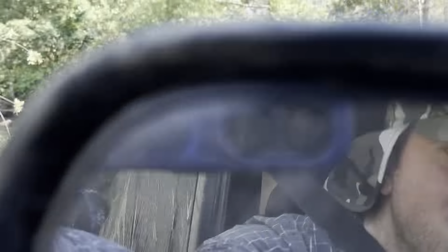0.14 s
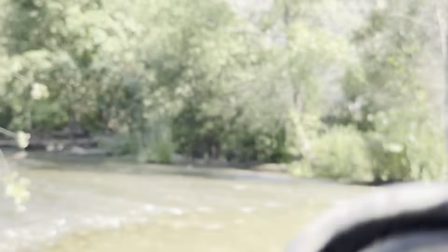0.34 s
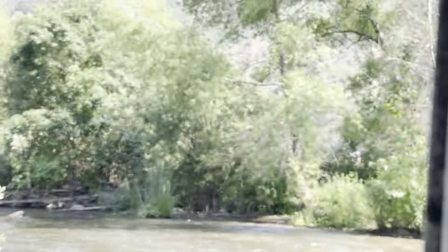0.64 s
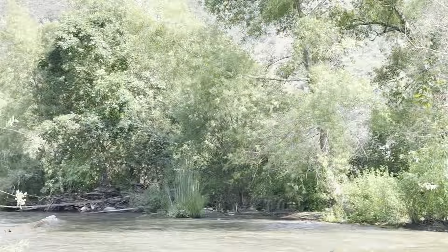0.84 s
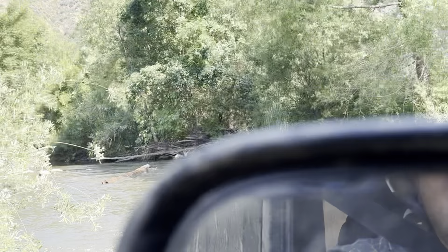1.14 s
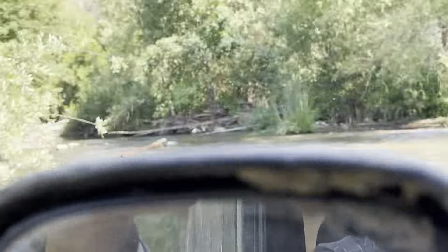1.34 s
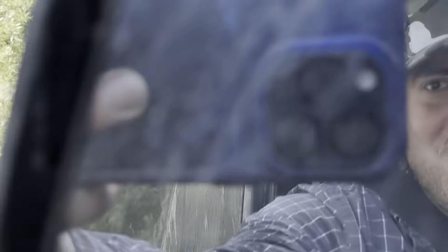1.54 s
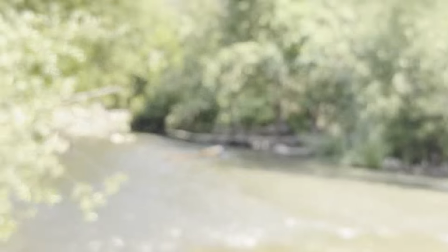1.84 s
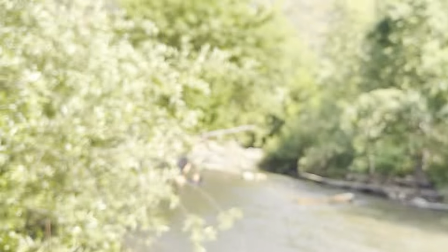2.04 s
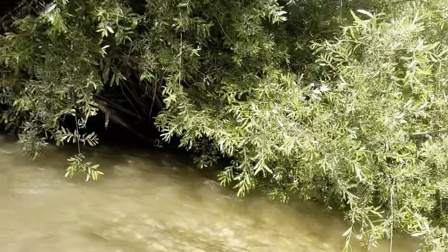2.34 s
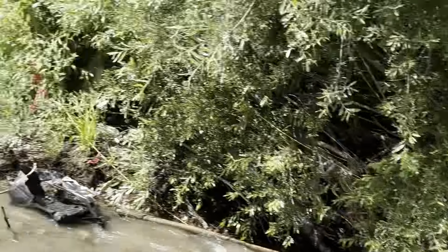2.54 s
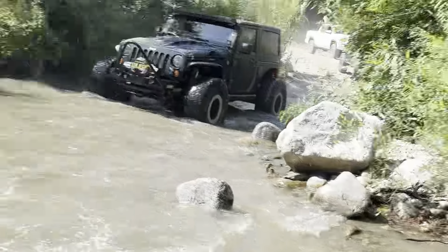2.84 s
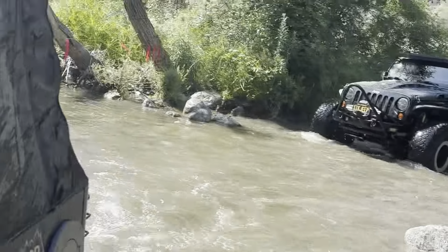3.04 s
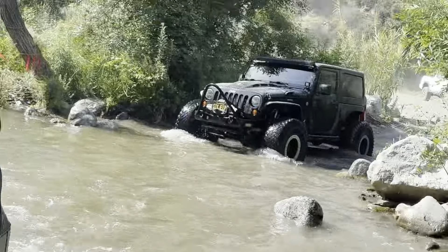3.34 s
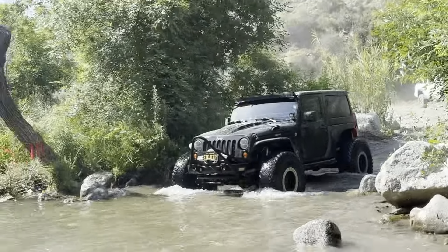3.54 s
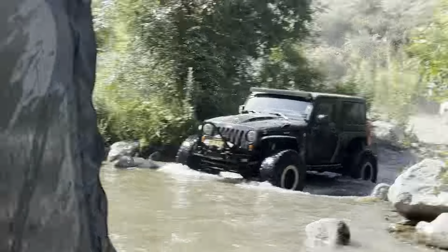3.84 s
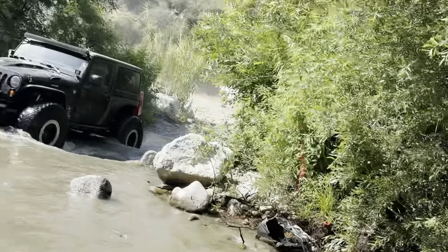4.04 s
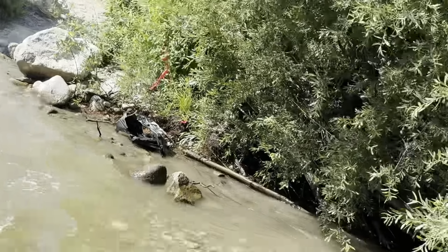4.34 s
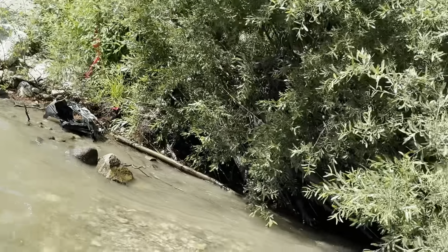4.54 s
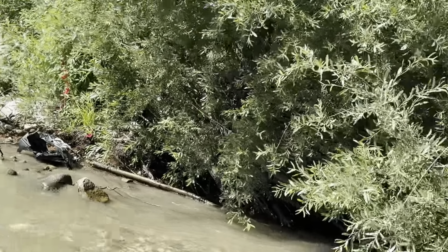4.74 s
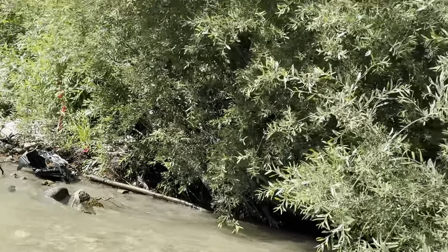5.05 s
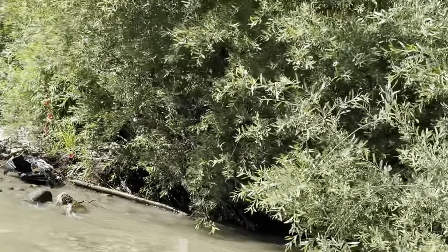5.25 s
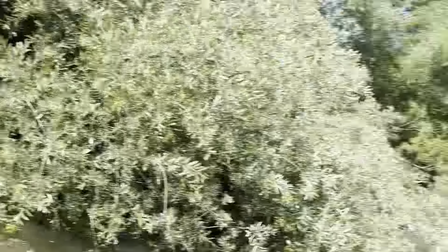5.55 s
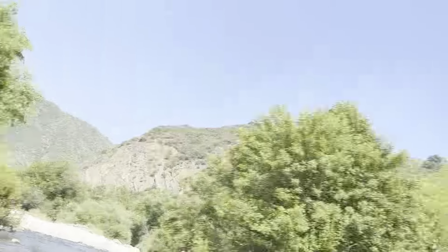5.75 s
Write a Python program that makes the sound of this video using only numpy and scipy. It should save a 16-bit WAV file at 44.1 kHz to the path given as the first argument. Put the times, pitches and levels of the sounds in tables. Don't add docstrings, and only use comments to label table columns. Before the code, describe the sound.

Heard from an open vehicle window, river water rushes and splashes, wind thumps the microphone, and a low engine growls, revs and sinks back.

```python
import sys
import numpy as np
from scipy import signal
from scipy.fft import rfft, irfft
from scipy.io import wavfile
from scipy.ndimage import uniform_filter1d

SR = 44100
rng = np.random.default_rng(int(sys.argv[2]) if len(sys.argv) > 2 else 0)


def how_loud(loudness_db):
    steps = np.asarray(loudness_db, float) / 20
    return 10 ** steps


def int16_out(signal):
    q = np.round(np.clip(np.atleast_2d(signal).T, -1, 1) * 32767)
    wavfile.write(sys.argv[1], SR, q.astype(np.int16))


N = 259308

# (time [s], firing rate [Hz], load [dB], dulling [dB per order])
REV = [
    [(3.5, 37.2, -17, 7), (3.64, 37.3, -13, 6), (3.72, 37.15, -7.5, 3), (3.79, 44.47, -8, 1.5),
     (3.86, 52.82, -4, 4), (3.99, 62.86, -12, 3.5), (4.15, 73.65, -15, 1.5), (4.258, 77.27, -17, -2),
     (4.44, 80.5, -17, -2.5)],
    [(4.512, 82.7, -26, -2.5), (4.594, 83.36, -15, -0.5), (4.75, 80.65, -25.5, -1), (4.9, 78.4, -21, -0.5),
     (5.17, 72.6, -21, 1)],
    [(5.27, 66.5, -22, 5), (5.4, 62.2, -22.5, 4.5), (5.728, 66.43, -13.5, 5.5), (5.88, 65.8, -16.5, 11)],
]
# (time [s], firing rate [Hz], load [dB])
PULL = [
    (2.75, 60.68, -17),
    (2.984, 74.4, -15),
    (3.11, 80.7, -14.5),
    (3.25, 83.76, -15.5),
    (3.4, 81.33, -16),
    (3.52, 76.5, -17),
    (3.6, 74.5, -34),
    (3.65, 74.5, -50),
]
# (centre [Hz], width [Hz], level [dB])
REV_PIPE = [(68, 38, 1), (107, 9.5, -2.5), (130, 33, 2), (151.3, 22, -3.5), (182, 23, 3.5), (216.6, 26, 1),
            (247.3, 32, 5), (326, 21, -12), (423.6, 73, -13.5), (573, 217, -9.5)]
PULL_PIPE = [(76, 13, -0.5), (121.5, 17, 2.5), (153, 14, -4), (170, 24.5, 2), (226, 33, -0.5),
             (247.7, 22, -1)]
# (time [s], gain [dB], order [-], length [s])
ORDER_BEATS = [(3.93, 5.5, 3, .04), (4.12, -7, 3, 0.062), (4.25, 4, 2, 0.14), (4.25, 5.5, 4, 0.091),
               (4.3, 2.5, 5, 0.092), (4.48, 7, 1, .04), (4.68, -6, 2, .07), (4.7, -1.5, 5.5, 0.27),
               (5.1, -9, 5.5, 0.15), (5.2, 3.5, 3, .05), (5.34, -11, 3, .05), (5.33, 7, 4, 0.049),
               (5.55, 6.5, 3, .1), (5.1, -8, 4, 0.072), (3.8, 11.5, 6, 0.053), (4.04, 7, 3, .05),
               (4.12, 6, 4, .07), (3.8, -3, 4, .04), (4.62, -5, 1, 0.074), (4.6, -4.5, 2, .06),
               (4.9, 6, 10, .1), (5.42, -2, 1, .03), (4.55, 6, 7, .1), (4.17, 8, 6.8, .08),
               (4.28, 4, 7, .06), (3.64, -8, 4, .08)]
# (time [s], level [dB])
BARK = [
    (3.95, -41),
    (4.1, -31),
    (4.17, -27.5),
    (4.3, -29.5),
    (4.47, -31),
    (4.56, -42.5),
    (4.8, -51),
    (4.93, -42),
    (5.05, -51.5),
]
# (centre [Hz], width [Hz], level [dB])
BARK_PIPE = [(578, 83, 7), (650, 39, 8), (735, 80, 2), (820, 84, -7), (893, 106, -5)]
# (time [s], length [s], level [dB], start pitch [Hz], end pitch [Hz])
MOANS = [(0.0, 0.47, -23.5, 136.7, 140.5), (0.53, 0.19, -21.5, 147.8, 149), (1.38, 0.19, -24, 134.7, 134.5),
         (1.581, 0.073, -13.5, 90, 90), (2.08, .1, -23, 74.5, 78), (2.3, 0.17, -16, 94.3, 93.4),
         (2.46, .19, -19, 83.3, 80), (2.54, 0.26, -28, 216.6, 272), (2.6, 0.092, -17, 158, 163),
         (2.76, 0.1, -20, 126, 130), (3.13, .09, -20, 58, 58), (3.38, 0.1, -19, 135, 137),
         (3.43, 0.3, -24, 270, 254), (5.3, .11, -22, 58, 56.44), (0.72, .1, -22, 150, 157),
         (1.54, .07, -21, 172, 150), (1.71, .09, -20, 148, 122), (1.84, .08, -20.5, 140, 156),
         (1.97, 0.068, -18.5, 85, 88), (2.18, .09, -18, 134.4, 150)]
# (time [s], peak [dB])
ROAR = [
    (3.93, -30),
    (4.17, -28),
    (4.3, -34),
]
# (centre [Hz], width [Hz], level [dB])
ROAR_MODES = [(570, 50, 9), (650, 45, 8), (722, 40, 9), (810, 60, 3)]
# (time [s], effort [dB])
RUMBLE = [(0.0, -25), (0.33, -20.5), (0.42, -20.5), (0.6, -19.5), (0.79, -20.5), (1.3, -19), (1.6, -22),
          (1.9, -19.5), (2.2, -19), (2.6, -19.5), (2.8, -19.5), (3.1, -13.5), (3.45, -20.5), (3.7, -18.5),
          (4.15, -17.5), (4.6, -30), (5.3, -24), (5.88, -28.5)]
# (centre [Hz], width [Hz], level [dB])
BOOM = [(44, 30, -0.5), (68.8, 22, 8)]
DRONE = [(112.4, 25.7, -5), (130, 51, -9.5), (171.3, 22, -9)]
GROWL = [(198.2, 59, 0), (252, 64, -1.5), (299.5, 73.5, -3.5), (390, 124, -22)]
# (time [s], gain [dB], pitch [Hz], length [s])
LURCHES = [(0.01, 11, 130, 0.13), (0.25, 4, 130, 0.11), (0.4, -13, 99, 0.056), (0.6, 5.5, 111, 0.08),
           (0.88, 3, 99, 0.036), (0.93, -2, 200, 0.02), (1.0, 15, 65.6, 0.02), (1.08, -4, 90.5, 0.035),
           (1.21, 2.5, 69, 0.032), (1.27, -6, 130, .06), (1.5, 1.5, 130, 0.11), (1.62, -6, 55, .06),
           (1.62, 7.5, 260, 0.034), (2.0, -6, 189, 0.092), (2.11, 1, 90, 0.035), (2.29, 11, 106, 0.094),
           (2.31, 7, 260, 0.18), (2.5, 3, 95.5, 0.11), (2.62, 5, 69, 0.043), (2.69, 7, 260, 0.033),
           (2.95, 0.5, 260, 0.045), (3.1, 0, 110, 0.089), (3.25, -0.5, 70, .1), (3.3, -4, 270, 0.072),
           (3.4, 7, 235, 0.048), (3.62, -3.5, 150.1, .08), (3.73, -4, 260.3, 0.035), (3.96, 3.5, 253, 0.1),
           (5.35, 4, 60, 0.058), (5.33, 0.5, 300, 0.057), (5.24, 6, 260, .07), (5.6, 4, 260, .1),
           (2.97, -4, 130, .05), (4.25, 3, 99, .1), (5.7, 10, 184, .08), (3.5, -7, 69, .25),
           (5.55, -8, 69, .35), (3.6, -5, 260, .15), (3.15, -4, 260, .1), (3.95, -4, 130, .2),
           (4.05, -6, 69, .25)]
# (time [s], flow [dB], microphone facing the spray [dB])
WATER = [(0.0, -34, -0.5), (0.4, -33, -0.5), (0.6, -35, -0.5), (1.0, -34.5, -1), (1.35, -35, -0.5),
         (1.6, -31.5, -0.5), (1.9, -33.5, 0.5), (2.25, -31, 1), (2.6, -32, 0.5), (2.9, -30.5, 0.5),
         (3.2, -31, 0.5), (3.5, -32.5, 1.5), (3.75, -31, 0.5), (4.15, -32.5, -2.5), (4.5, -39, 1),
         (5.0, -39, 0), (5.45, -36, 0.5), (5.88, -41.5, -0.5)]
# (frequency [Hz], density [dB per Hz])
CHURN = [(330, -4), (450, 0), (600, -2), (800, -5), (1100, -9), (1500, -15)]
WASH = [(1000, 1.5), (1400, -1), (2000, -1), (2800, -5.5), (4000, -10.5)]
SPRAY = [(3000, -3.5), (4000, -1.5), (5000, 2), (6500, 3), (8000, 4), (11500, 0.5), (13000, 3),
         (15000, 2.5), (16000, 1)]
# (time [s], swell [dB], pitch [Hz], length [s])
WAVES = [(0.06, 1, 1500, 0.039), (0.18, 1.5, 6000, 0.033), (0.41, 6, 700, 0.049), (0.38, 2, 900, .07),
         (1.7, 2.5, 1000, .1), (2.35, 4, 550, .07), (2.2, 3, 550, .02), (0.87, 1.5, 8000, .02),
         (0.96, 3.5, 8000, 0.044), (1.08, 2.5, 2070, 0.11), (1.47, 2.5, 800, 0.037), (1.65, 3, 8000, 0.038),
         (1.73, 5, 795, 0.049), (1.85, 4.5, 600, 0.071), (2.31, 0, 1490, 0.019), (2.41, 1.5, 2500, 0.022),
         (2.49, 4, 1500, .03), (2.88, 2.5, 1500, 0.031), (3.1, 6, 3980, 0.022), (3.47, 3, 8000, 0.018),
         (3.75, 3.5, 2500, 0.025), (4.14, 4, 600, 0.042), (4.21, 4.5, 1500, 0.037), (4.96, 8, 1007, 0.027),
         (5.53, 7, 1500, 0.028), (5.63, 5.5, 1204, 0.024)]
# (time [s], peak [dB], t60 [s])
SLAPS = [(0.1276, -37, 0.047), (0.1594, -29, 0.053), (0.4125, -32, 0.098), (0.457, -17, 0.04),
         (0.603, -24, 0.06), (0.9911, -30, 0.3), (1.158, -27, 0.18), (1.4356, -27, 0.064),
         (2.3994, -27, 0.07), (2.5326, -35, 0.07), (3.0887, -21, 0.12), (3.3204, -26, 0.068),
         (3.473, -33, 0.069), (3.726, -16, 0.053), (4.664, -25, 0.027), (4.9577, -26, 0.18),
         (5.1547, -36, 0.05), (5.3303, -21, 0.046), (5.4312, -31, 0.051), (5.5303, -35, 0.053)]
# (time [s], peak [dB], pitch [Hz])
DRIPS = [(0.13, -36, 2690), (0.413, -31, 2570), (0.869, -38, 3850), (1.1618, -37, 4450),
         (1.4364, -31.5, 3140)]
# (time [s], peak [dB])
TICKS = [(0.075, -20), (0.158, -18), (0.1795, -15.5), (0.3551, -19), (0.9662, -13.5), (0.992, -17),
         (1.858, -15.5), (2.1476, -13.5), (2.8654, -24), (3.246, -17), (3.3204, -19), (3.473, -22),
         (4.3605, -23), (4.666, -25), (4.968, -37), (5.335, -35), (5.4326, -29)]
# (time [s], peak [dB], pitch [Hz], snap [dB])
THUMPS = [(0.288, -13, 130, -37), (0.728, -5, 167, -34), (0.861, 4, 155, -9), (0.9165, 4, 200, -12),
          (0.947, -11, 160, -17), (0.999, -14, 131, -28), (1.202, -17, 182, -28), (1.99, 2, 196, -25),
          (2.01, -3, 215, -16), (2.022, -12, 250, -14), (2.215, -8, 200, -16), (2.247, -3, 140, -30),
          (2.323, -3, 130, -25), (2.085, -8, 170, -10), (2.109, 1, 150, -11), (2.267, 0, 125, -14),
          (2.299, -12, 190, -4), (2.317, -23, 254, -11), (2.339, -4, 200, -5), (2.378, -16, 250, -13),
          (2.402, -19, 203, -6), (2.461, -3, 130, -38), (2.511, -5, 150, -11), (2.661, -40, 157, -38),
          (5.154, -25, 302.3, -19)]
# (frequency [Hz], likeness [-])
LIKENESS = [(60, 0.92), (300, 0.79), (700, 0.68), (1200, 0.7), (1700, 0.91), (2300, 0.64), (3300, 0.49),
            (4500, 0.91), (8000, 0.84), (15000, 1)]
# (from [Hz], to [Hz])
NO_SUM = [(8250, 9610), (13180, 13760)]
NO_DIFFERENCE = [(4350, 7950), (11000, 11720), (15200, 22050)]
PATCHY_HZ = [1950, 2600, 3100, 3700, 4350]
SUM_RETURNS_S = [.36, .54, .69, .87, 1.0, 1.1, 2.67, 3.97, 4.2, 4.67, 4.74, 4.98, 5.33, 5.55]


def rms_one(x):
    return x / np.sqrt(np.mean(x ** 2) + 1e-20)


def in_time(rows):
    s, *columns = np.transpose(rows)
    return [np.interp(np.arange(N) / SR, s, c) for c in columns]


def at_hz(points, hz):
    points_hz, values = np.transpose(points)
    return np.interp(np.log(hz), np.log(points_hz), values)


def drift(rate_hz):
    r = np.exp(-80 * np.pi * rate_hz / SR)
    noise = rng.standard_normal(N // 40 + 2002)
    slow = signal.lfilter([1], [1, -2 * r, r * r], noise)[2000:]
    return np.interp(np.arange(N) / 40, np.arange(len(slow)), rms_one(slow))


def resonate(x, hz, width_hz):
    r = np.exp(-np.pi * width_hz / SR)
    poles = [1, -2 * r * np.cos(2 * np.pi * hz / SR), r * r]
    return signal.lfilter([(1 - r * r) / 2, 0, (r * r - 1) / 2], poles, x)


def spread(mid, side, hz):
    alike = np.clip(at_hz(LIKENESS, hz), 0, 1)
    return np.sqrt(1 + alike) * mid + np.sqrt(1 - alike) * side * [[1], [-1]]


def swells(events, hz, octaves, rise_share=0.72):
    t = np.arange(0, N, 64) / SR
    gain_db = 0
    for s, db, pitch, length_s in events:
        pitch_off = np.log2(pitch / hz) / octaves
        time_off = (t - s) / np.where(t < s, rise_share * length_s, length_s)
        gain_db = gain_db + db * np.exp(-pitch_off ** 2 - time_off ** 2)
    return np.interp(np.arange(N) / SR, t, gain_db)


def through(pipe, hz):
    power = sum(how_loud(2 * db) / (1 + (2 * (hz - f) / width) ** 2) ** 2 for f, width, db in pipe)
    return 10 * np.log10(power)


def dying(events, t60s_s):
    out = np.zeros(N)
    for (s, db, *_), t60_s in zip(events, t60s_s):
        start = round(s * SR)
        t = np.arange(N - start)[:SR // 2] / SR
        out[start:][:len(t)] += how_loud(db - 60 * t / max(t60_s, .01)) * (1 - np.exp(-t / .001))
    return out


def orders(rows, firing_hz, voices, wobble_db, waver):
    t = np.arange(N) / SR
    turn = 2 * np.pi * np.cumsum(firing_hz * (1 + waver * drift(9))) / SR
    eased = np.clip((t - 4.48) / .08, 0, 1)
    tone = 0
    for k, level_db in voices:
        flicker = drift(12)
        phase = .45 * k + np.pi / 2 * eased + .1 * np.sqrt(k) * flicker[::-1]
        tone = tone + how_loud(level_db + wobble_db * flicker) * np.cos(k * turn + phase)
    fade_in = np.clip((t - rows[0][0]) / 0.14, 0, 1)
    fade_out = np.clip((rows[-1][0] + 0.19 - t) / 0.015, 0, 1)
    return -np.sqrt(2) * tone * fade_in * fade_out


def barking_db(k, hz):
    return in_time(BARK)[0] + through(BARK_PIPE, k * hz)


def engine():
    rows = np.concatenate(REV)
    hz, load_db, dulling_db = in_time(rows)
    lugging_db = .8 * np.maximum(68 - hz, 0)
    voices = []
    for k in range(1, 11):
        dull_db = dulling_db * min(k - 1, 3.83)
        lug_db = (k % 2 + 0.7 * max(k - 5, 0)) * lugging_db
        silencer_db = 90 * np.maximum(k * hz - 440, 0) / 1000
        db = load_db - dull_db - lug_db + through(REV_PIPE, k * hz) - silencer_db
        db = db + swells(ORDER_BEATS, k, octaves=.25)
        if k >= 7:
            db = 10 * np.log10(how_loud(2 * db) + how_loud(2 * barking_db(k, hz)))
        voices.append((k, db))
    rev = orders(rows, hz, voices, wobble_db=1.4, waver=.0028)
    hz, load_db = in_time(PULL)
    voices = [(k, load_db + through(PULL_PIPE, k * hz)) for k in (1, 2, 3.5)]
    both = rev + orders(PULL, hz, voices, wobble_db=1.2, waver=.003)
    return both + how_loud(-24.5) * np.roll(both, 130) * [[1], [-1]]


def bark():
    hz = in_time(np.concatenate(REV))[0]
    voices = [(k, barking_db(k, hz)) for k in (11, 12)]
    tone = orders(BARK, hz, voices, wobble_db=3.0, waver=.003)
    return tone + how_loud(-13) * np.roll(tone, 40) * [[1], [-1]]


def moans():
    out, waver, flicker = np.zeros(N), drift(10), drift(15)
    for s, length_s, db, from_hz, to_hz in MOANS:
        span = slice(round(s * SR), round((s + length_s) * SR))
        share = np.linspace(0, 1, len(out[span]))
        hz = (from_hz + (to_hz - from_hz) * share) * (1 + .01 * waver[span])
        swell = np.sqrt(np.sin(np.pi * share).clip(0))
        level = how_loud(db + 3 + 1.3 * flicker[span])
        out[span] += level * swell * np.sin(2 * np.pi * np.cumsum(hz) / SR)
    return out


def roar():
    hz = in_time(np.concatenate(REV))[0]
    pulse = (1 + 1.1 * np.cos(2 * np.pi * np.cumsum(hz) / SR)) ** 2
    gulp = pulse * rng.standard_normal((2, N))
    rung = sum(how_loud(db) * resonate(resonate(gulp, f, width), f, width) for f, width, db in ROAR_MODES)
    t = np.arange(N) / SR
    open_wide = 0
    for s, db in ROAR:
        slope_db_per_s = np.where(t < s, 90, 45)
        open_wide = open_wide + how_loud(db - abs(t - s) * slope_db_per_s)
    return open_wide * rms_one(spread(*rung, 600))


def rumble():
    struck = rng.random((2, N)) < 90 / SR
    strength = how_loud(2.5 * np.minimum(rng.exponential(1, (2, N)), 3))
    knocks = struck * strength * rng.choice([-1, 1], (2, N))
    drive = rms_one(knocks) * 0.66 + rng.standard_normal((2, N))
    effort_db = in_time(RUMBLE)[0]
    out = 0
    for modes, share_db in ((BOOM, 0.5), (DRONE, 0), (GROWL, -0.5)):
        level_db = effort_db + share_db + swells(LURCHES, modes[1][0], octaves=0.57)
        rung = 0
        for k, (hz, width_hz, db) in enumerate(modes):
            twice = resonate(resonate(drive, hz, 1.54 * width_hz), hz, 1.54 * width_hz)
            rung = rung + how_loud(db) * (-1) ** k * twice
        out = out + how_loud(level_db - 2.5) * rms_one(spread(*rung, modes[0][0]))
    return out


def rush(spectrum, patchy_db, grains, shared):
    low, high = spectrum[0][0], min(spectrum[-1][0], .45 * SR)
    edges = np.geomspace(low, high, round(3 * np.log2(high / low)) + 1)
    strength = how_loud(4.5 * np.minimum(rng.exponential(1, N), 5))
    drops = rms_one((rng.random(N) < 900 / SR) * strength)
    white = rng.standard_normal((2, 2, N)) * (1 + grains * uniform_filter1d(drops, size=40))
    out = 0
    for k, (a, b) in enumerate(zip(edges, edges[1:])):
        band = signal.butter(2, [a, b], "band", fs=SR, output="sos")
        mid, side = signal.sosfilt(band, white[k % 2])
        hz = np.sqrt(a * b)
        level_db = at_hz(spectrum, hz) + patchy_db * drift(28.4) + shared
        out = out + how_loud(level_db) * spread(mid, side, hz)
    return rms_one(out)


def water():
    flow_db, facing_db = in_time(WATER)
    churn_db = flow_db + 6 - facing_db + swells(WAVES, 540, octaves=1.33)
    wash_db = flow_db + swells(WAVES, 2800, octaves=1.33)
    spray_db = flow_db + 0.5 + facing_db + swells(WAVES, 6400, octaves=1.33)
    surge_db = 0.52 * drift(43) + 0.1 * drift(60)
    slaps = dying(SLAPS, [t60_s for _, _, t60_s in SLAPS])
    churn = how_loud(churn_db) * rush(CHURN, patchy_db=1.76, grains=0.11, shared=0.21 * surge_db)
    wash = rush(WASH, patchy_db=1.0, grains=.9, shared=.5 * surge_db)
    spray = rush(SPRAY, patchy_db=1.25, grains=1.0, shared=surge_db)
    wash = (how_loud(wash_db) + how_loud(-11) * slaps) * wash
    spray = (how_loud(spray_db) + how_loud(-10) * slaps) * spray
    return churn + wash + spray


def drips():
    out = np.zeros(N)
    t = np.arange(SR // 20) / SR
    for s, db, hz in DRIPS:
        ring = np.sin(2 * np.pi * hz * t * (1 + 0.6 * t)) * np.exp(-t / 0.016)
        out[round(s * SR):][:len(t)] += how_loud(db + 3) * ring
    return out


def thumps():
    out = np.zeros(N)
    t = np.arange(SR // 10) / SR
    snap_turn = 2 * np.pi * np.cumsum(300 + 300 * np.exp(-t / .004)) / SR
    snap = (1 - np.exp(-t / .0015)) * np.exp(-t / .005) * np.sin(snap_turn)
    swing_lag_s = .0025
    for s, db, hz, snap_db in THUMPS:
        turn = 2 * np.pi * np.cumsum(.85 * hz + 250 * np.exp(-t / .003)) / SR
        swell = how_loud(db - 1) * (1 - np.exp(-t / 0.0031)) * np.exp(-t * hz / 2.12)
        out[round(s * SR):][:len(t)] -= how_loud(snap_db + 5) * snap
        out[round((s + swing_lag_s) * SR):][:len(t)] -= swell * np.sin(turn)
    return signal.sosfilt(signal.butter(2, 900, fs=SR, output="sos"), out)


def ticks():
    highpass = signal.butter(4, 5800, "high", fs=SR, output="sos")
    bright = signal.sosfilt(highpass, rng.standard_normal((2, N)))
    return dying(TICKS, [.02] * len(TICKS)) * spread(*bright, 9000)


def scene():
    vehicle = engine() + bark() + moans() + roar() + rumble()
    river = water() + drips()
    microphone = thumps() + ticks()
    return (vehicle + river + microphone) * how_loud(np.array([[.15], [-.15]]))


def band_limit(x):
    return signal.sosfilt(signal.butter(12, 17110, fs=SR, output="sos"), x)


def record(dry):
    hz, t = np.arange(N // 2 + 1) * SR / N, np.arange(N) / SR
    treble_lead = np.pi * (hz - 11200) / 4400
    low_lead = -.15 * np.exp(-((hz - 3100) / 500) ** 2)
    lead_rad = np.where(hz > 7950, treble_lead, low_lead)
    rounded = .98 * dry / (1 + abs(dry) ** 3) ** (1 / 3)
    passed = (hz < 15800) * (hz > 15)
    left, right = rfft(rounded) * np.exp(1j * lead_rad * [[1], [-1]]) * passed
    total, difference = (left + right) / 2, (left - right) / 2

    def inside(low, high):
        return (hz > low) & (hz < high)

    back = sum(np.clip(2 - abs(t - s) / .015, 0, 1) for s in SUM_RETURNS_S)
    mid = irfft(total * (1 - sum(inside(*band) for band in NO_SUM)), N)
    mid += back * irfft(total * inside(*NO_SUM[0]), N)
    dropped = sum(inside(*band) for band in NO_DIFFERENCE) + inside(*PATCHY_HZ[::4])
    side = irfft(difference * (1 - dropped), N)
    for low, high, rarity in zip(PATCHY_HZ, PATCHY_HZ[1:], (1.0, .1, 0., 1.1)):
        patches = np.clip(3 * (drift(12) - rarity), 0, 1)
        side += patches * irfft(difference * inside(low, high), N)
    return band_limit(np.array([mid + side, mid - side]))


dry = scene()
out = record(dry)
int16_out(out)
```